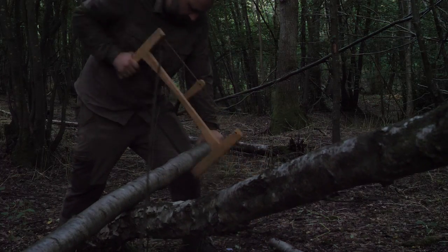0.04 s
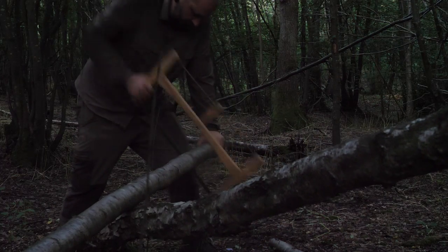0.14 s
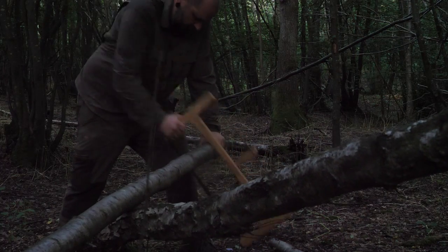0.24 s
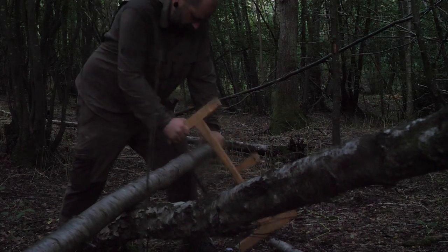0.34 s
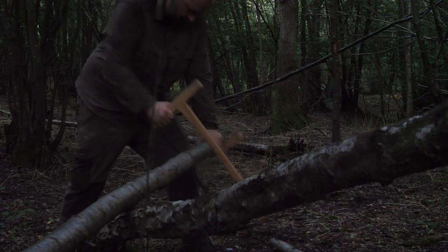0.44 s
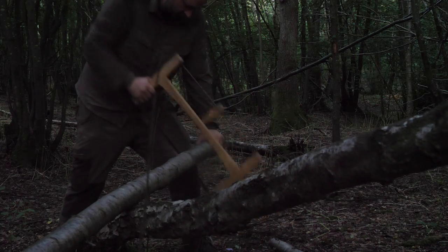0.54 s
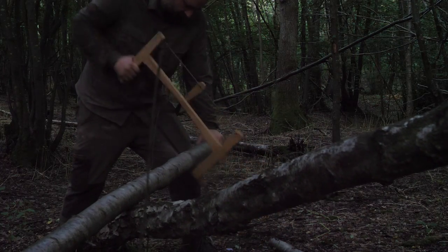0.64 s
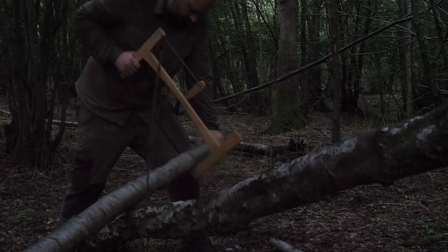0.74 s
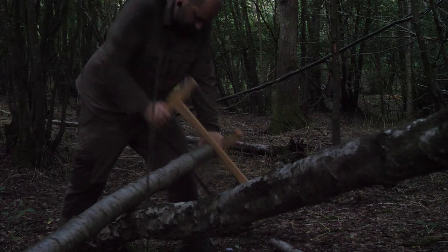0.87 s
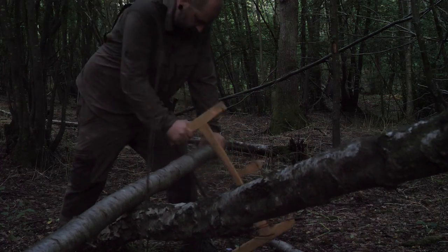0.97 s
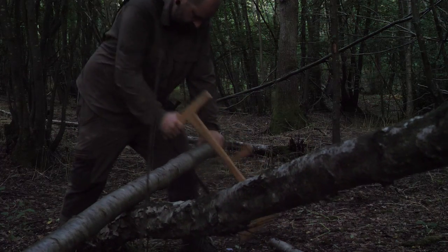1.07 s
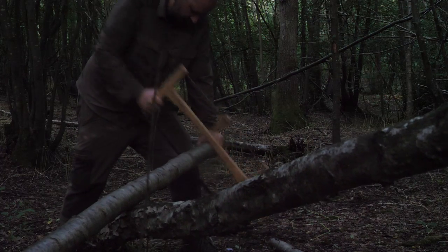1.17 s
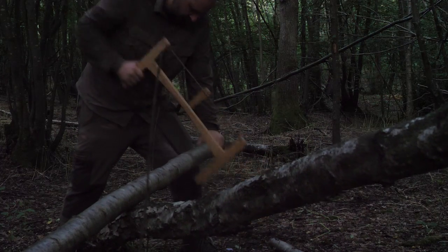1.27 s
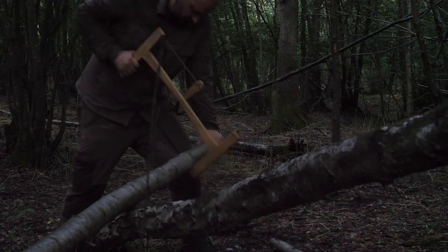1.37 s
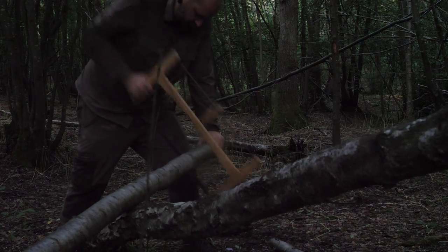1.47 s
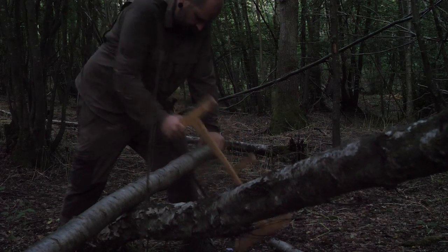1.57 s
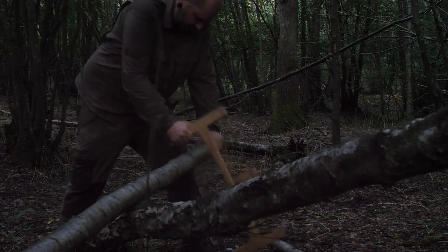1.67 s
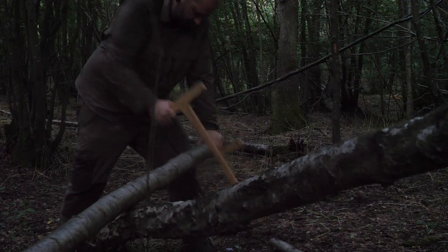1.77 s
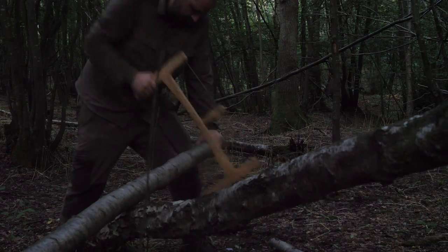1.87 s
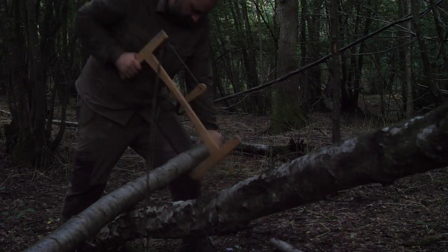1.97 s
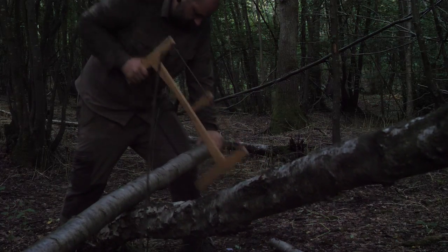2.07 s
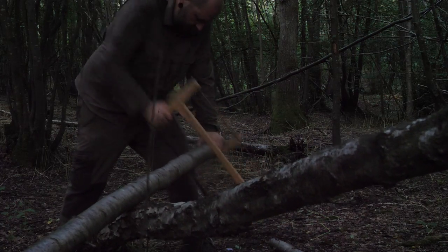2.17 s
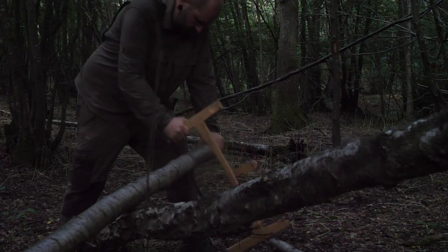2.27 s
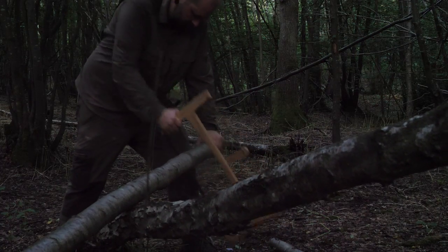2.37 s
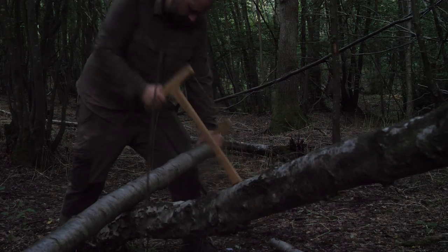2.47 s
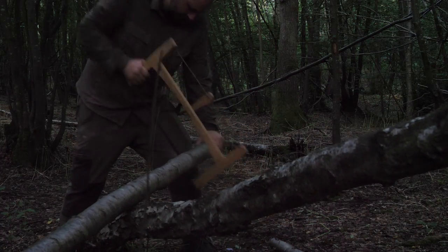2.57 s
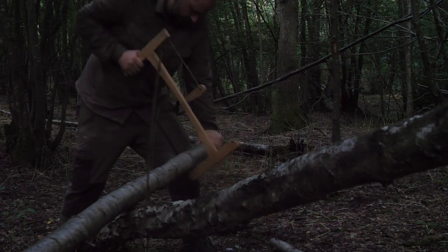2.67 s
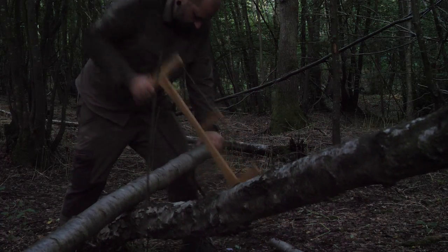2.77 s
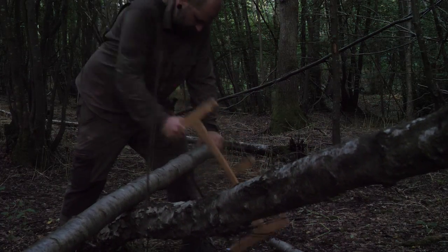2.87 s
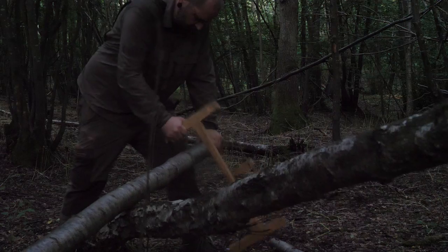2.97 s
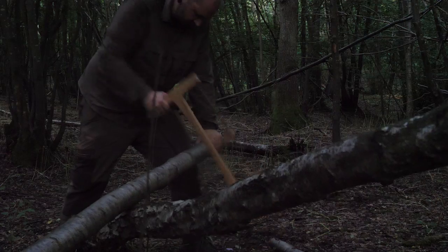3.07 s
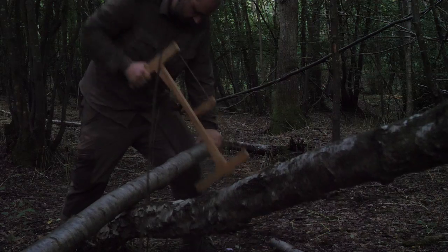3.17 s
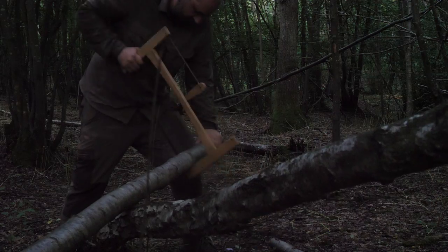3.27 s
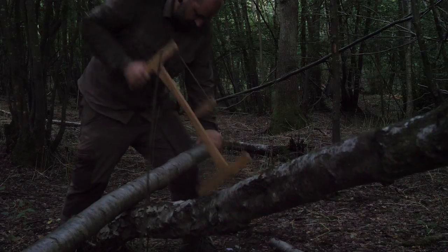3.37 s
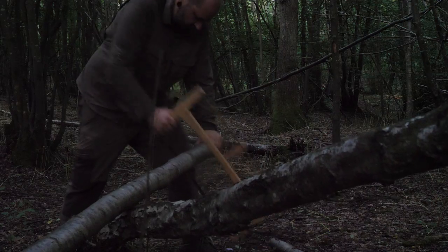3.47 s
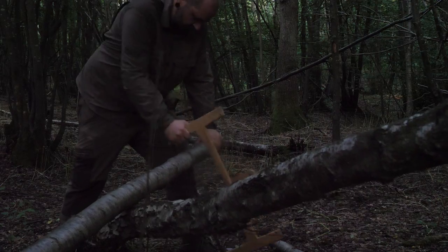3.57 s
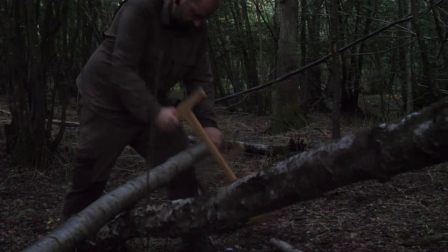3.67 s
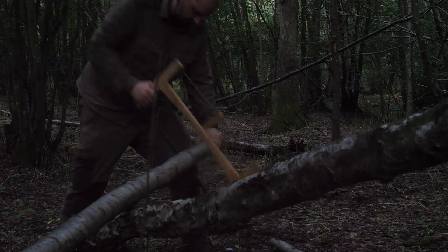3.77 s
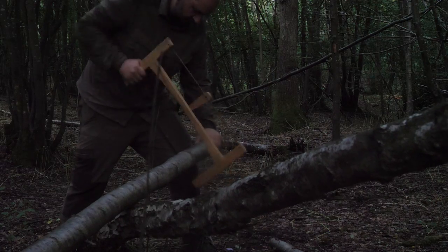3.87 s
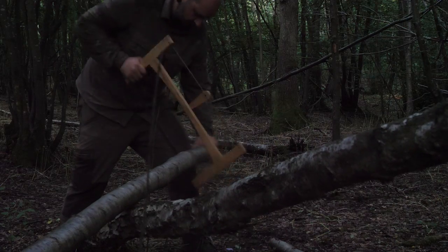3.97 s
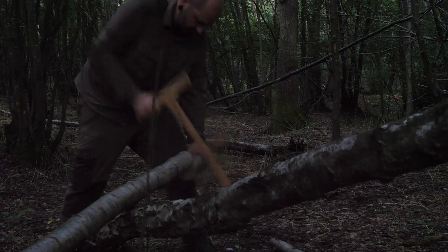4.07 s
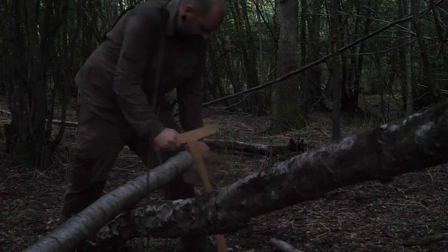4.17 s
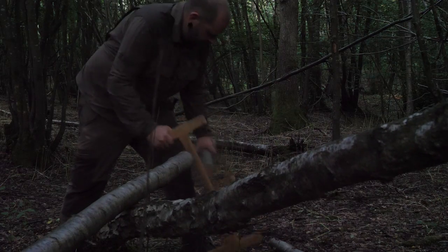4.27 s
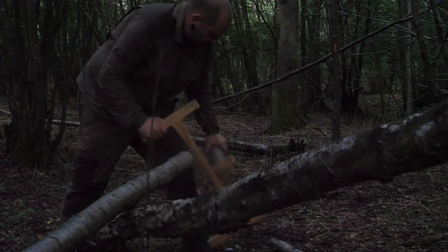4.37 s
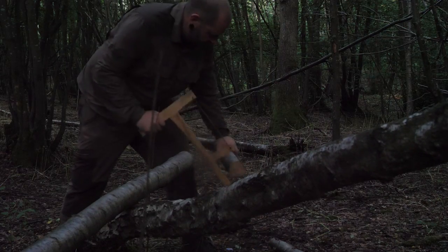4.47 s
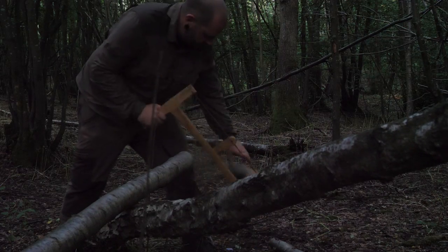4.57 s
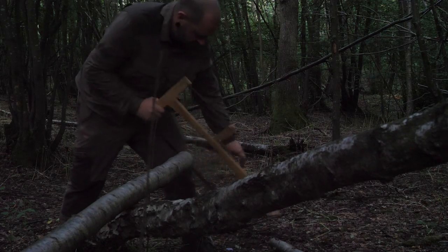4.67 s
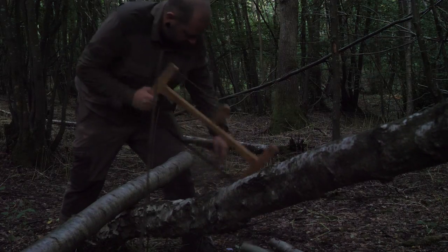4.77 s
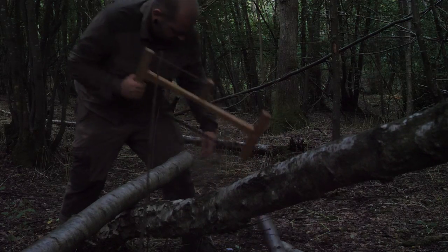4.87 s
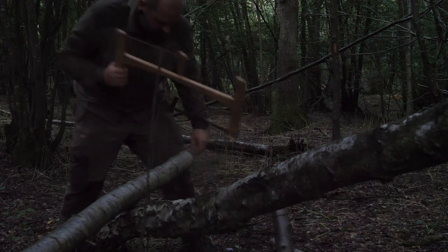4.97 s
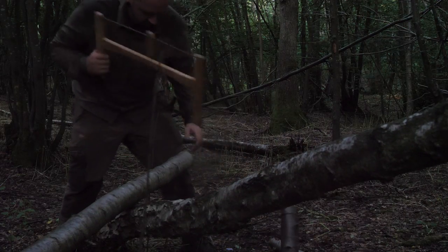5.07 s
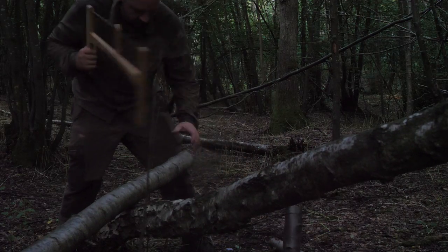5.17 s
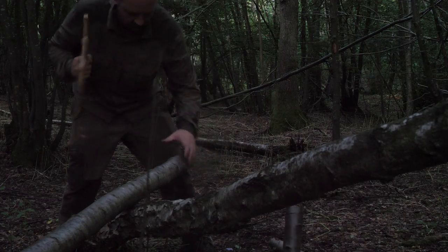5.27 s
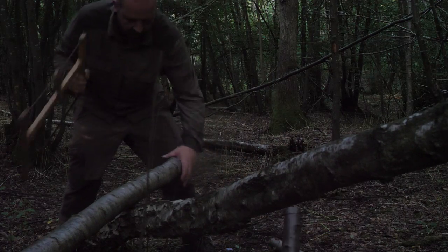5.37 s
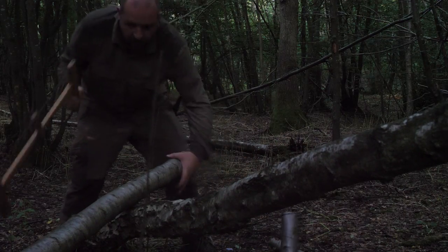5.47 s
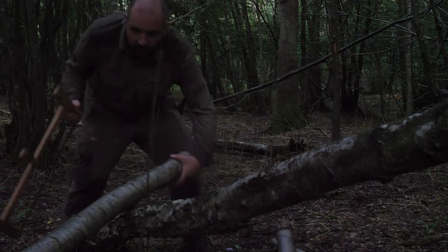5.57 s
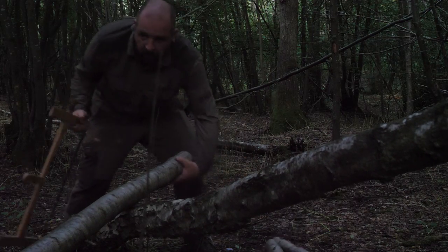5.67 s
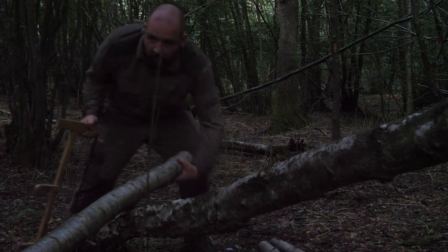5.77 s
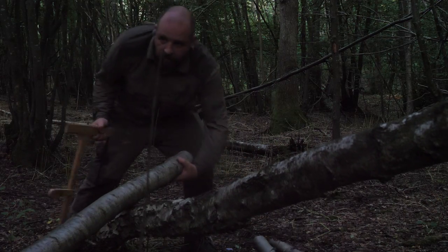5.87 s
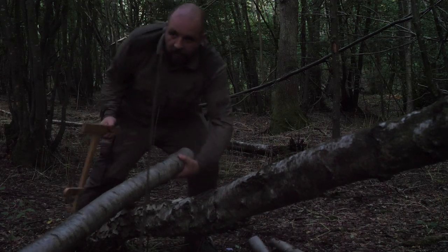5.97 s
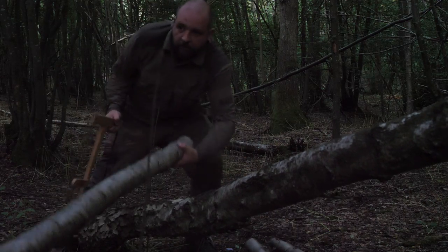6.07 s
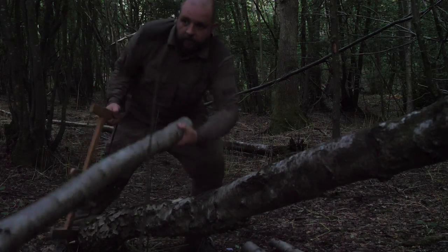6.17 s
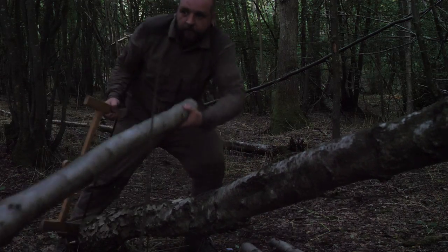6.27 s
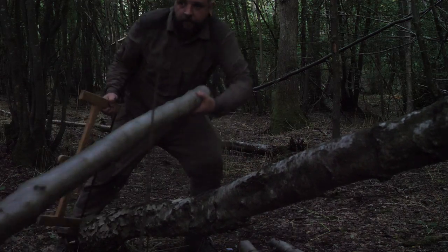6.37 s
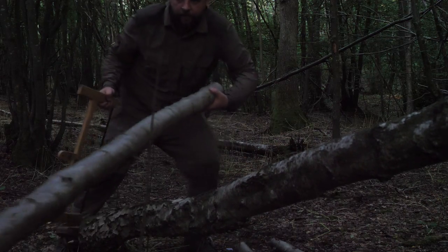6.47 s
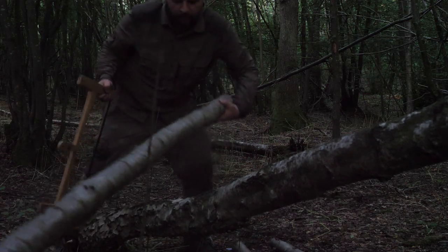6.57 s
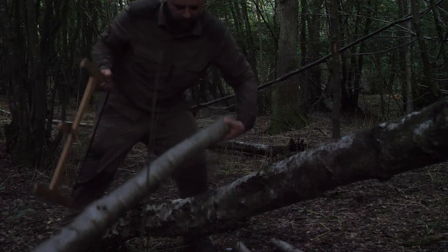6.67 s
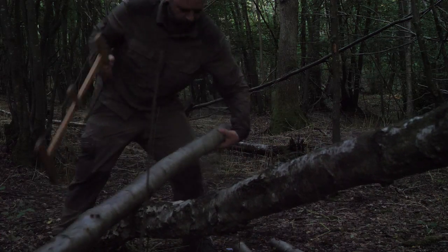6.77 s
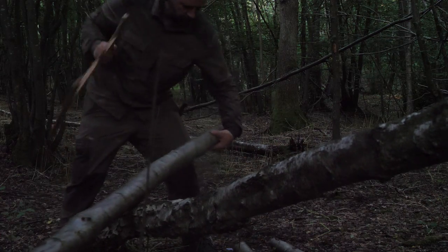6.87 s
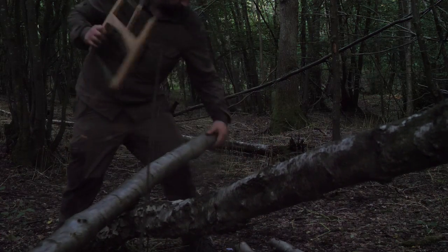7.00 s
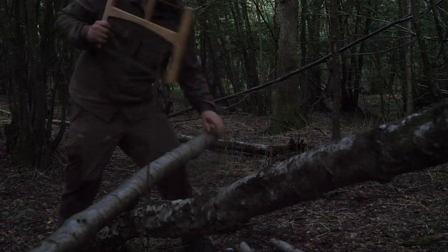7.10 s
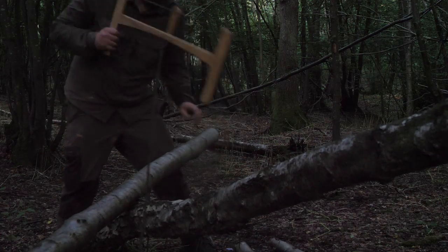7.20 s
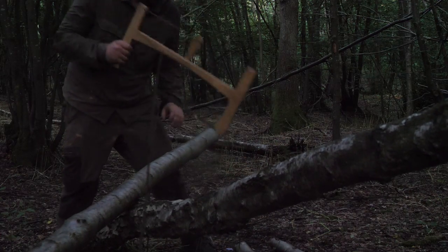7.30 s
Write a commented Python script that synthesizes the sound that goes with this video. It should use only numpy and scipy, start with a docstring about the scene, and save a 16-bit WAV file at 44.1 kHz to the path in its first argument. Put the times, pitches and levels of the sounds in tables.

```python
"""Bow saw in a quiet wood

A wooden-framed bow saw cuts a dry log: loud pushes and lighter, snagging pulls, made of tooth-paced noise
through the blade's resonances, with the frame knocking on the log as bursts of dying modes.
The blade comes free ringing, and the offcut drops and topples as short modal thuds under noisy crunches.
The log is dragged forward through leaves, in filtered random clicks, and set down for the next cut."""
import sys
import numpy as np
from scipy import signal
from scipy.fft import rfft, irfft, next_fast_len
from scipy.io import wavfile

SR = 44100
rng = np.random.default_rng(int(sys.argv[2]) if len(sys.argv) > 2 else 0)


def wav_record(signal):
    """Record a signal, one row per channel, as 16-bit PCM in the file named by sys.argv[1]."""
    frames = np.transpose(np.atleast_2d(signal))
    bounded = np.clip(frames, -1, 1)
    # unit amplitude maps onto the largest positive 16-bit level
    quanta = np.round(bounded * 32767).astype(np.int16)
    wavfile.write(sys.argv[1], SR, quanta)


N = 323694
TIME = np.arange(N) / SR  # s


def amp(db):
    """Decibels to gain."""
    return 10 ** (np.asarray(db) / 20)


def unit(x):
    """Scales to an rms of one."""
    return x / np.sqrt(np.mean(x ** 2) + 1e-20)


def read(points, hz):
    """Reads a spectrum on a log-frequency axis."""
    f, value = np.transpose(points)
    return np.interp(np.log(hz + 1), np.log(f + 1), value)


def follow(rows):
    """Each column of a curve at every sample."""
    s, *columns = np.transpose(rows)
    return [np.interp(TIME, s, c) for c in columns]


def colour(x, points):
    """Filters x by a spectrum."""
    size = next_fast_len(len(x))
    gain = amp(read(points, np.fft.rfftfreq(size, 1 / SR)))
    return irfft(rfft(x, size) * gain, size)[:len(x)]


def band(x, lo_hz, hi_hz):
    """Causal band-pass."""
    edges = [lo_hz, min(hi_hz, SR / 2 - 1)]
    return signal.sosfilt(signal.butter(2, edges, "band", fs=SR, output="sos"), x)


def resonate(x, hz, width):
    """A resonance of gain one that follows hz: shifted down to zero, smoothed, shifted back."""
    turn = np.exp(2j * np.pi * np.cumsum(hz * np.ones(len(x))) / SR)
    r = np.exp(-np.pi * width / SR)
    smoothed = signal.lfilter([1 - r], [1, -r], x / turn + 1e-18)
    return 2 * (turn * smoothed).real


def wander(per_s):
    """Smooth chance of about unit size."""
    return np.interp(TIME * per_s, np.arange(N), rng.standard_normal(N))


def grains(per_s, spread_db):
    """Random clicks, a few of them large."""
    clicks = (rng.random(N) < per_s / SR) * rng.standard_normal(N)
    boost_db = spread_db * np.minimum(rng.exponential(1, N), 4)
    return unit(clicks * amp(boost_db))


def ring(modes, t):
    """Dying modes after one blow."""
    return sum(amp(db - 60 * t / t60) * np.sin(2 * np.pi * hz * t) for hz, db, t60 in modes)


def burst(t, t60):
    """A dying puff of noise."""
    return rng.standard_normal(len(t)) * amp(-60 * t / t60)


def add(mix, s, sound):
    """Adds a sound at time s."""
    part = mix[max(round(s * SR), 0):][:len(sound)]
    part += sound[:len(part)]


# spectrum of the woodland air: [f/Hz, relative level/dB]
AIR_SPECTRUM = [(25, -39), (55, -12), (90, -34), (130, -14.5), (230, -18.5), (400, -19.5), (800, -24),
                (1280, -26.5), (1800, -30.5), (3000, -33.5), (8000, -41.5), (15800, -50)]


def air(wash_db=-58, drone_db=-59, rumble_db=-70):
    """Still woodland air as filtered noise, with a far, low drone that grows between 2 and 4 s."""
    wash = unit(colour(rng.standard_normal(N), AIR_SPECTRUM)) * amp(.5 * wander(2.8))
    drone = unit(band(rng.standard_normal(N), 85, 97.7)) * np.interp(TIME, [2, 4], [.35, 1])
    rumble = unit(band(rng.standard_normal(N), 21, 72)) * amp(2.7 * wander(4.5))
    return amp(wash_db) * wash + amp(drone_db) * drone + amp(rumble_db) * rumble


# snaps of twigs, splinters and bark: [t/s, relative level/dB]
TWIG_SNAPS = [(4.097, -32), (4.326, -48), (5.26, -37), (5.314, -45), (5.924, -55), (6.192, -34),
              (6.24, -28), (6.64, -42), (6.69, -39), (7.241, -40.5)]


def twigs(crackle_db=-73):
    """Twigs and flakes of bark snap as puffs of noise, over a faint crackle of litter underfoot."""
    out, t = np.zeros(N), np.arange(2000) / SR
    for s, db in TWIG_SNAPS:
        snap = burst(t, .016)
        add(out, s, amp(db) * (band(snap, 900, 3500) + .15 * snap))
    crackle = unit(band(grains(500, 3), 1200, 9000)) * amp(2 * wander(6))
    return out + amp(crackle_db) * crackle


# cutting strokes away from the body, the last one breaking through:
# [start t/s, length t/s, force level/dB, relative chatter level/dB, bending note at full speed f/Hz]
PUSH_STROKES = [(0.085, .28, -21.5, -5.5, 439), (0.755, .29, -21, -2, 431), (1.416, .295, -21, -4, 423),
                (2.058, .274, -21, -4, 415), (2.714, .27, -21, -4, 393.5), (3.341, .29, -22, -2, 351),
                (3.984, .14, -29.5, -2.5, 419)]
# lighter return strokes: [start t/s, length t/s, force level/dB, relative chatter level/dB]
PULL_STROKES = [(-.23, .3, -26.5, -2), (.397, .355, -30, -5), (1.079, .33, -29, -7.5),
                (1.74, .307, -27, -10.5), (2.366, .341, -31.5, -7.5), (3.008, .31, -28, -11.5),
                (3.662, 0.3, -29.5, -36)]
PUSH_SWING, PULL_SWING = 2.36, 1.09  # loudness grows with this power of the blade's speed
EARLY = .94  # below one, the arm is fastest a little before mid-stroke
PULL_NOTE_HZ = 472
NOTE_RISE = 0.2  # the bending note is higher by up to this share when the blade is slow and unloaded
RUB_DB = -55  # the teeth still rub as the arm turns round
# the blade slides out of the finished cut from this time, falling away at this rate
FREE_S, SLIDE_OUT_DB, SLIDE_OUT_DB_PER_S = 4.09, -37, 150


def motion():
    """Place (0 drawn back, 1 pushed home), direction, bite, chatter and bending note all follow the arm."""
    place, pushing, bite = np.ones(N), np.zeros(N), np.zeros(N)
    chatter_db, note_hz = np.zeros(N), np.zeros(N)
    strokes = [(*row, 1) for row in PUSH_STROKES] + [(*row, PULL_NOTE_HZ, 0) for row in PULL_STROKES]
    for start, length, force_db, stroke_chatter_db, hz, forward in sorted(strokes):
        way = np.clip((TIME - start) / length, 0, 1) ** EARLY
        begun = TIME >= start
        speed = abs(np.sin(np.pi * way))
        place += (2 * forward - 1) * (1 - np.cos(np.pi * way)) / 2
        pushing[begun], chatter_db[begun] = forward, stroke_chatter_db
        note_hz[begun] = hz * (1 + NOTE_RISE * (1 - speed[begun] ** 2))
        bite += amp(force_db) * speed ** (PUSH_SWING if forward else PULL_SWING)
    slide_out_db = SLIDE_OUT_DB - SLIDE_OUT_DB_PER_S * (TIME - FREE_S)
    bite += amp(np.where(TIME < FREE_S, RUB_DB, slide_out_db))
    return place, pushing, bite, chatter_db, note_hz


def blade_ring(count=200):
    """The crowd of fine modes of a tensioned steel strip, drawn afresh at each call."""
    t = np.arange(SR // 8) / SR
    hz, phase = rng.uniform(2500, 15500, (count, 1)), rng.uniform(0, 2 * np.pi, (count, 1))
    t60 = .06 + .09 * hz / 15500  # s
    tail = (amp(-60 * t / t60) * np.sqrt(hz) * np.sin(2 * np.pi * hz * t + phase)).sum(0)
    return tail / np.linalg.norm(tail)


# rasp of the teeth on the push: [f/Hz, relative level/dB]
PUSH_RASP = [(100, -32), (200, -20), (330, -14), (520, -3.5), (750, 1.5), (1150, -1.5), (1650, 1),
             (2400, -5), (3800, -2.5), (5300, -9.5), (8700, -10.5), (10500, -19.5), (13500, -17),
             (15500, -22.5)]
# rasp of the teeth on the pull: [f/Hz, relative level/dB]
PULL_RASP = [(100, -18.5), (200, -4), (330, -11), (560, -3.5), (750, 1), (1200, 1.5), (1900, -1),
             (2400, -5.5), (3500, -3), (5300, -9.5), (8700, -12.5), (10500, -23.5), (13500, -19),
             (15500, -26)]
# resonances of the steel blade, fixed in pitch: [f/Hz, width f/Hz, mean level/dB]
STEEL_MODES = [(1650, 70, -6), (1925, 70, -4), (3110, 130, -4), (3770, 120, -7), (4560, 130, -6),
               (7900, 400, -5), (11620, 400, 2), (12810, 160, 7), (13250, 500, 1)]


def saw(teeth=70, rasp_db=0.0, chatter_db=-2.0, second_db=-9, comb=0.2, ring_db=-8, crunch_db=-6):
    """Teeth tear fibres and set the blade ringing, its free length changing along the stroke."""
    place, pushing, bite, stroke_chatter_db, note_hz = motion()
    passed = teeth * np.cumsum(abs(np.gradient(place)) * (1 + .2 * wander(150)))
    # every tooth gives a spurt of tiny fractures; pulls run less evenly and crack coarser splinters
    uneven = amp((2.4 - 1.3 * pushing) * (wander(70) + .8 * wander(170)))
    since_tooth = passed - np.floor(passed)
    spurts = (1 + np.exp(-since_tooth / 0.24)) * uneven
    splinters = amp(crunch_db) * (1 - .5 * pushing) * grains(1500, 2.5)
    tear = unit(spurts * (rng.standard_normal(N) + splinters))
    # the wave sent along the blade returns sooner or later with the length in use
    trip_s = 0.0024 + 0.00153 * place
    tear = unit(tear + comb * np.interp(TIME - trip_s, TIME, tear))
    steel = tear + sum(amp(db + 2 * wander(22.55)) * resonate(tear, hz, width) for hz, width, db in STEEL_MODES)
    push_rasp = pushing * unit(colour(steel, PUSH_RASP))
    pull_rasp = (1 - pushing) * unit(colour(steel, PULL_RASP))
    rasp = bite * (push_rasp + pull_rasp)
    # the fine modes shift with every new grip of the cut
    shimmer = np.zeros(N)
    for start, length, *_ in PUSH_STROKES + PULL_STROKES:
        stroke = rasp[max(round(start * SR), 0):round((start + length) * SR)]
        add(shimmer, start, signal.fftconvolve(stroke, blade_ring()))
    # the blade chatters on its wavering bending note, only while the cut grips it
    gripped = TIME < FREE_S
    bend_hz = note_hz * (1 + 0.091 * wander(30))
    bending = resonate(resonate(tear, bend_hz, 185), bend_hz, 430)
    chatter = unit(band(bending, 235, 1090)) * amp(2.95 * wander(38)) * gripped
    # the next bending mode gains as the cut deepens
    second = unit(resonate(resonate(tear, 1170 - 110 * place, 160), 1240, 310)) * pushing
    second = second * np.interp(TIME, [0, 3], [.25, 1.2]) * gripped
    bends = amp(chatter_db + stroke_chatter_db) * chatter + amp(second_db) * second
    return amp(rasp_db) * (rasp + amp(ring_db) * shimmer) + bite * bends


# echo among the trunks: [f/Hz, t60 t/s]
TRUNK_ECHO = [(100, 0.62), (600, 0.56), (2000, 0.47), (6000, 0.13), (15000, 0.72)]


def woods(x):
    """Sparse echoes from the trunks, each band dying at its own speed."""
    taps = rng.standard_normal(SR) * (rng.random(SR) < 2500 / SR)
    taps = taps * (np.arange(SR) > .012 * SR)  # nothing returns in the first 12 ms
    hz, t, z = signal.stft(taps, SR, nperseg=256)
    fade = amp(-60 * t / read(TRUNK_ECHO, hz)[:, None])
    tail = signal.istft(z * fade, SR, nperseg=256)[1]
    return signal.fftconvolve(x, tail / np.linalg.norm(tail))[:N]


# the frame meets the log near the ends of strokes, levels before the trims of knocks():
# [t/s, thump level/dB, thump f/Hz, clack level/dB, crack level/dB]
FRAME_KNOCKS = [(0.365, -44, 496, -48, -49), (0.722, -24.5, 463, -54, -57), (1.019, -31, 500, -27, -37),
                (1.36, -15.5, 460, -28, -42), (1.675, -32.5, 504.9, -31.5, -40.5),
                (2.323, -27.5, 527, -21.5, -35.5), (3.303, -25, 410, -42, -52),
                (3.624, -38.5, 460, -42, -40), (3.943, -14.5, 730, -18, -23.5)]
# modes of the saw frame: [f/Hz, relative level/dB, t60 t/s]
FRAME_MODES = [(349, -22, 0.11), (464, -8, 0.029), (564, 1, 0.02), (714, -4, 0.021), (782, -10, 0.034),
               (1138, 3.5, 0.024), (1340, 3, 0.02), (1613, 12.5, 0.0078), (1853, -4.5, 0.016),
               (2250, -11, 0.012)]


def knocks(thump_db=-1, clack_db=0, crack_db=0):
    """The wooden frame hits the log: its modes and noise split into a thump, a clack and a crack."""
    out, t = np.zeros(N), np.arange(8000) / SR
    for s, thump, thump_hz, clack, snap in FRAME_KNOCKS:
        blow = ring(FRAME_MODES, t) + 2 * burst(t, 0.058) + 0.031 * burst(t, 0.05)
        blow = blow * (1 - np.exp(-t / 0.00089))
        crack = burst(t, 0.056) * (1 - np.exp(-t / 0.00017))
        low = band(blow, 0.66 * thump_hz, 1.35 * thump_hz)
        parts = low, band(blow, 1180, 2000), band(crack, 2100, 6900)
        for part, db, trim_db in zip(parts, (thump, clack, snap), (thump_db, clack_db, crack_db)):
            # levelled on the first 5 ms
            add(out, s, amp(db + trim_db) * part / np.std(part[:SR // 200]))
    return out


# catches of the blade on the pulls, first mainly juddering, then mainly squealing:
# [first catch t/s, first judder level/dB, second squeal level/dB]
PULL_SNAGS = [(.477, -24.5, -29), (1.154, -25.5, -31.5), (1.812, -22, -23.5), (2.455, -22.5, -27.5),
              (3.102, -20, -21.5), (3.788, -27, -32)]
SQUEAL_HZ = 3190
SECOND_CATCH_S, CATCH_RISE_S = 0.094, 0.0068  # delay after the first catch; rise of each
FIRST_SQUEAL_DB, SECOND_JUDDER_DB = -4.5, -5  # the lesser sound of each catch, against its main one


def snags():
    """A tooth catches: a short swell of low judder with a squeal of steel."""
    out, t = np.zeros(N), np.arange(3000) / SR
    swell = t / CATCH_RISE_S * np.exp(1 - t / CATCH_RISE_S)
    for first, low_db, high_db in PULL_SNAGS:
        judder_catch = first, low_db, low_db + FIRST_SQUEAL_DB
        squeal_catch = first + SECOND_CATCH_S, high_db + SECOND_JUDDER_DB, high_db
        for s, judder_db, squeal_db in (judder_catch, squeal_catch):
            noise = rng.standard_normal(len(t))
            judder = amp(judder_db) * unit(band(noise, 336, 695) + 0.9 * band(noise, 1010, 1315))
            squeal = amp(squeal_db) * unit(resonate(noise, SQUEAL_HZ, 410) + 0.065 * noise)
            add(out, s - .003, swell * (judder + squeal))
    return out


# modes of the freed blade: [f/Hz, relative level/dB]
FREE_BLADE_MODES = [(640, -72), (860, -63), (885, -72), (1500, -68), (1525, -58), (1863, -67.5),
                    (2035, -65.5), (3257, -63.5), (12737, -63), (13582, -86)]


def free_blade(ring_db=7, t60=0.73):
    """The blade leaves the cut and rings out; its high modes die first."""
    out, t = np.zeros(N), np.arange(SR) / SR
    modes = [(hz, db + ring_db, t60 * min(1, (1500 / hz) ** .25)) for hz, db in FREE_BLADE_MODES]
    add(out, FREE_S, 2 * ring(modes, t) * (1 - np.exp(-t / 0.0084)))
    return out * amp(2.5 * wander(25))


def falls(blows, modes, low_hz, crack_t60, crack_hz, tick_db, contact_s):
    """Heavy wood lands: its modes build up over the time of contact, with a crunch on top."""
    out, t = np.zeros(N), np.arange(SR // 3) / SR
    for s, db, crunch_db in blows:
        body = band(ring(modes, t) * (1 - np.exp(-t / contact_s)), low_hz, 1600)
        crunch = band(burst(t, crack_t60), 500, crack_hz) + amp(tick_db) * burst(t, 0.035)
        add(out, s, amp(db) * body + amp(crunch_db) * crunch)
    return out


# the offcut lands on the soil: [t/s, relative thud level/dB, relative litter crunch level/dB]
OFFCUT_DROPS = [(4.7995, -24.5, -31.5), (4.8265, -32, -29), (4.8432, -13, -29)]
# modes of the struck soil: [f/Hz, relative level/dB, t60 t/s]
SOIL_MODES = [(104, -4.5, 0.069), (160, 3.5, 0.033), (216, -1, 0.035), (467, -2, 0.022), (1560, 5, 0.009),
              (1710, -25, 0.11)]


def offcut_drop():
    """The offcut lands on the soil: short low modes under a crunch of litter."""
    return falls(OFFCUT_DROPS, SOIL_MODES, low_hz=75, crack_t60=0.051, crack_hz=3200,
                 tick_db=-11, contact_s=0.0022)


# the offcut topples against other wood: [t/s, relative clonk level/dB, relative crack level/dB]
OFFCUT_TOPPLES = [(5.6112, -23, -38), (5.6155, -34, -50), (5.632, -40.5, -44)]
# modes of the offcut: [f/Hz, relative level/dB, t60 t/s]
OFFCUT_MODES = [(322, -8, 0.038), (472, -3, 0.056), (558, 6.5, 0.027), (645, 3, 0.022), (778, -13, 0.13),
                (1170, -29, 0.068), (1345, 1, 0.056), (1380, -3, 0.074), (1530, -6.5, 0.14),
                (1630, -27, .05), (2660, -13, .04)]


def offcut_topple():
    """The offcut topples against other wood: a very brief contact sets its modes clonking."""
    return falls(OFFCUT_TOPPLES, OFFCUT_MODES, low_hz=220, crack_t60=0.25, crack_hz=2480,
                 tick_db=-6.5, contact_s=0.00018)


# the long log is hauled forward in one swell: [t/s, leaf hiss level/dB before hiss_db]
HAUL_SWELL = [(5.94, -71), (6.016, -71.5), (6.506, -44), (6.7, -44.5), (6.728, -54.5), (7.098, -71),
              (7.15, -69)]
BARK_FOLLOWS = 0.42  # share of that swell, in dB, which the scrape of bark follows
# its weight bears on the support around the set-down: [t/s, half-length t/s, peak scrape level/dB]
BEARING_SCRAPES = [(6.684, 0.034, -44.5), (6.901, 0.083, -49.5)]
# spectrum of the dead leaves: [f/Hz, relative level/dB]
LEAF_SPECTRUM = [(1180, -13), (2000, -1.5), (3630, -2), (7010, 3), (8400, -1), (12600, -3.5), (15100, -8),
                 (15800, -21)]
# spectrum of the scraping bark: [f/Hz, relative level/dB]
BARK_SPECTRUM = [(150, -15), (450, 2), (900, 0.5), (1700, -5), (2800, -7.5), (5000, -16), (12000, -28)]
# modes of the long log, also struck in log_set_down(): [f/Hz, relative level/dB, t60 t/s]
LOG_MODES = [(104.3, -9, 0.32), (178, 2.5, 0.049), (229, 1, 0.053), (373, -2, 0.056), (499, -15, 0.098),
             (897, -11, 0.063), (1506, 0, 0.019), (1700, -27, 0.068), (2050, -21, 0.048), (2810, -34, .04)]


def drag(hiss_db=1, scrape_db=-50, hollow_db=0, pressed_hollow_db=15):
    """The log's far end sweeps dead leaves while its bark scrapes the support and rings the log."""
    leaves_db, = follow(HAUL_SWELL)
    hiss = unit(colour(grains(7000, 1.0), LEAF_SPECTRUM)) * amp(0.76 * wander(35))
    slips = grains(1500, 1.9)
    hollow = sum(resonate(slips, hz, 34) for hz, _, _ in LOG_MODES if hz > 450)
    light = unit(colour(slips + amp(hollow_db) * hollow, BARK_SPECTRUM))
    pressed = unit(colour(slips + amp(pressed_hollow_db) * hollow, BARK_SPECTRUM))
    sliding = amp(scrape_db + BARK_FOLLOWS * (leaves_db - leaves_db.max()))
    bearing = sum(amp(db) * np.exp(-((TIME - s) / half) ** 2) for s, half, db in BEARING_SCRAPES)
    moving = np.interp(TIME, [5.85, 5.95, 7.0, 7.5], [0, 1, 1, 0])
    return moving * (amp(leaves_db + hiss_db) * hiss + sliding * light) + bearing * pressed


CREAK_START_S, CREAK_S, CREAK_PER_S = 5.92, .46, 62  # start, length, typical tick rate


def creak(level_db=-55, uneven=0.35, tick_t60=0.0066):
    """Bark sticks and slips as the log starts to move: uneven dry ticks that swell and die."""
    count = np.floor(np.cumsum(CREAK_PER_S * np.exp(uneven * wander(60))) / SR)
    slips = np.diff(count, prepend=0) * (1 + rng.random(N))
    ticks = rng.standard_normal(N) * signal.fftconvolve(slips, amp(-60 * TIME[:600] / tick_t60))[:N]
    swell = np.sin(np.pi * np.clip((TIME - CREAK_START_S) / CREAK_S, 0, 1))
    return amp(level_db) * swell * unit(band(ticks, 580, 1900))


# the long log is set down on its support: [t/s, relative thud level/dB, relative crack level/dB]
LOG_SETTLES = [(6.738, -17.5, -25.5), (6.7445, -24.5, -50), (6.761, -25.5, -54), (6.788, -33.5, -40)]


def log_set_down():
    """The log meets its support in several blows that ring its modes."""
    return falls(LOG_SETTLES, LOG_MODES, low_hz=85.5, crack_t60=0.099, crack_hz=2580,
                 tick_db=-17, contact_s=0.0019)


def scene(echo_db=-23, side_db=-23):
    """All sources stand straight ahead; only a trace of the echo is wide."""
    dry = twigs() + saw() + knocks() + snags() + free_blade()
    dry = dry + offcut_drop() + offcut_topple() + drag() + creak() + log_set_down()
    mid = dry + amp(echo_db) * woods(dry) + air()
    side = amp(side_db) * colour(woods(mid), [(500, -8.5), (12000, -23.5)])  # (f/Hz, level/dB)
    return np.array([mid + side, mid - side])


def record(dry):
    """A steep low-pass takes away the extreme treble."""
    lowpass = signal.firwin(401, 15850, window=("kaiser", 9), fs=SR)  # edge f/Hz
    return signal.oaconvolve(dry, lowpass[None], "same")


dry = scene()
out = record(dry)
wav_record(out)
```